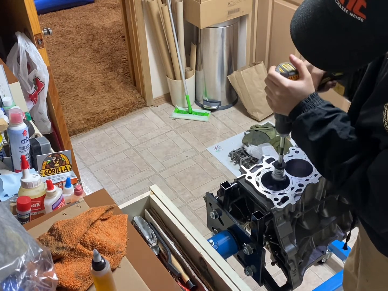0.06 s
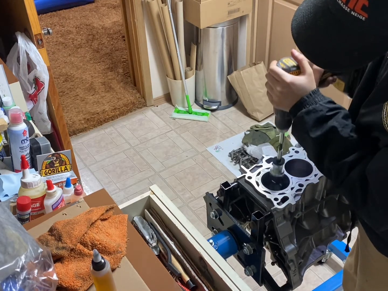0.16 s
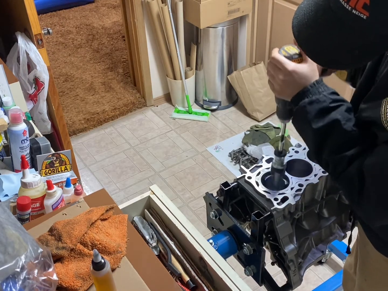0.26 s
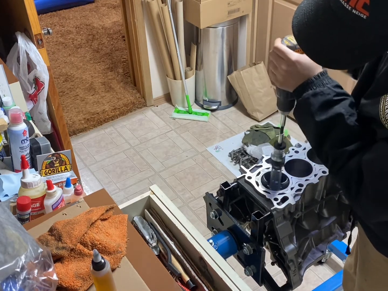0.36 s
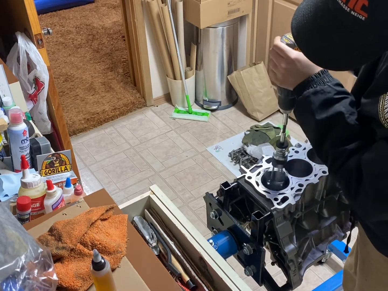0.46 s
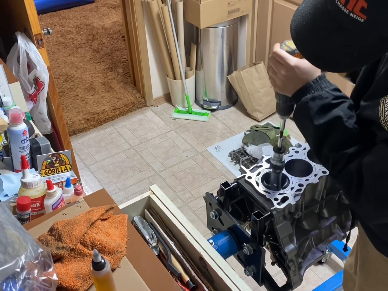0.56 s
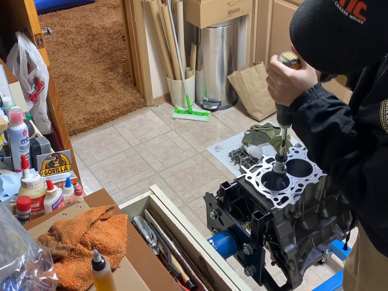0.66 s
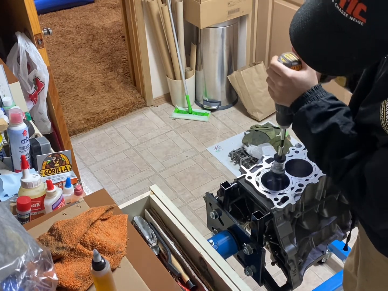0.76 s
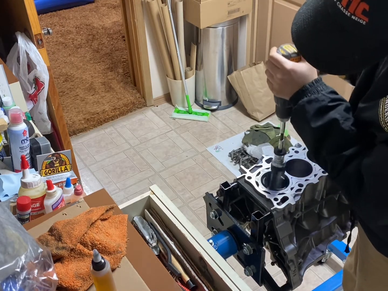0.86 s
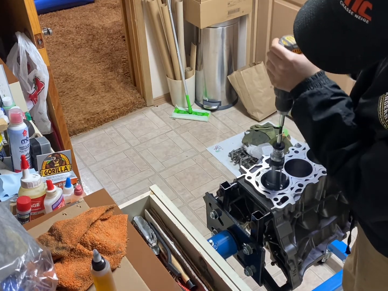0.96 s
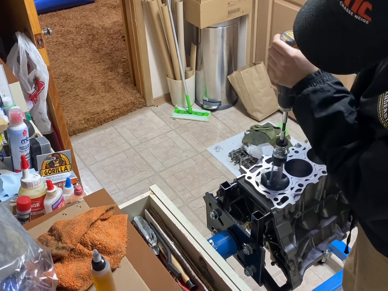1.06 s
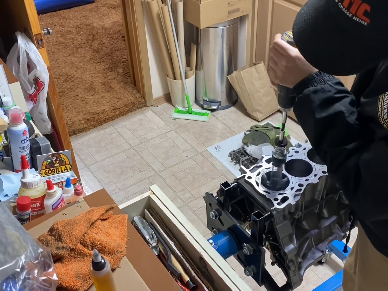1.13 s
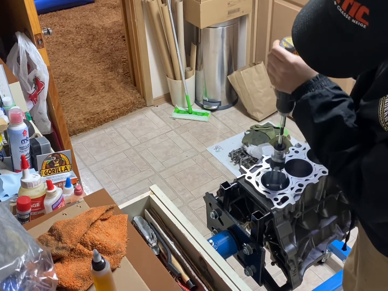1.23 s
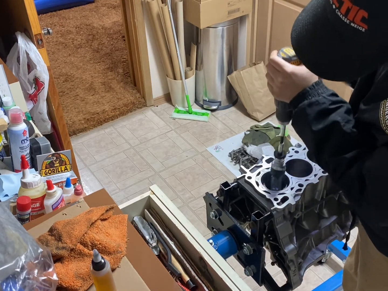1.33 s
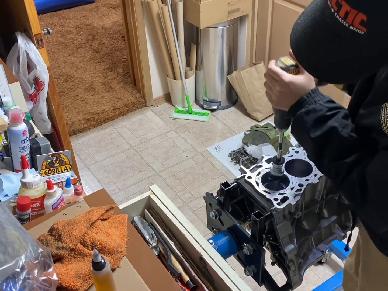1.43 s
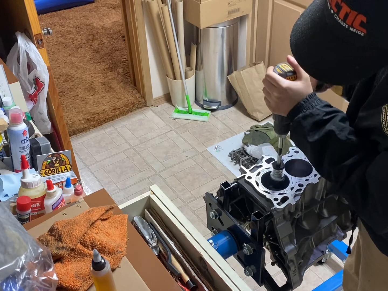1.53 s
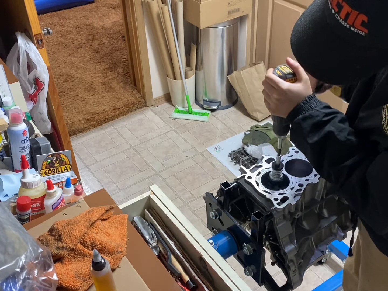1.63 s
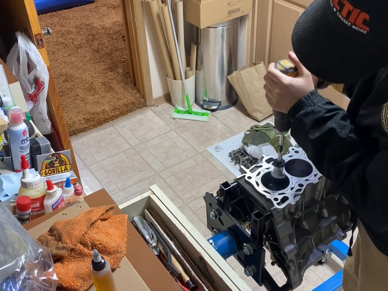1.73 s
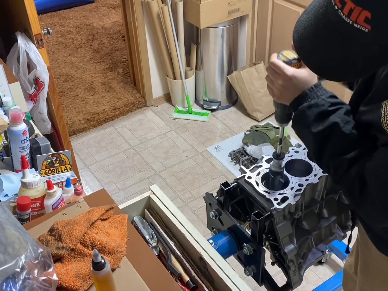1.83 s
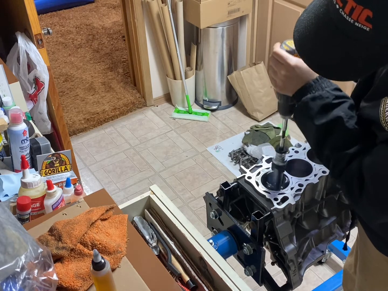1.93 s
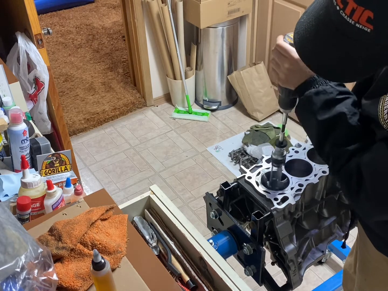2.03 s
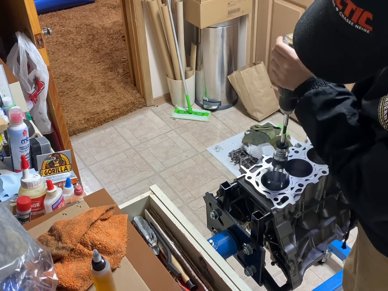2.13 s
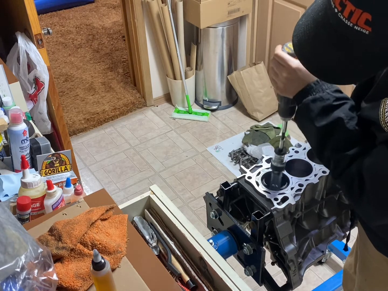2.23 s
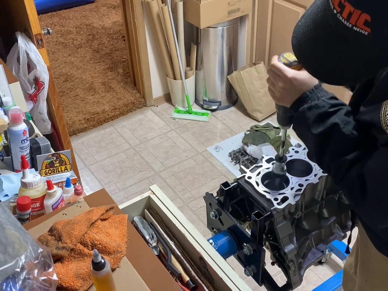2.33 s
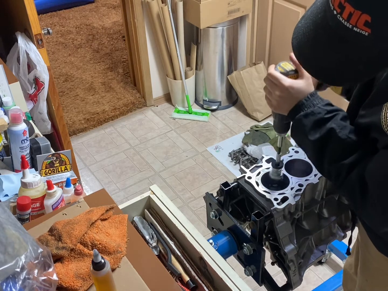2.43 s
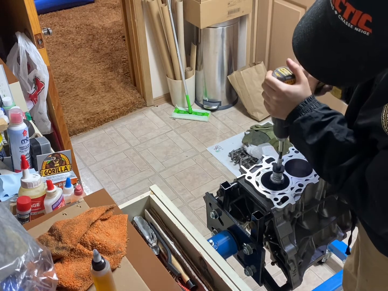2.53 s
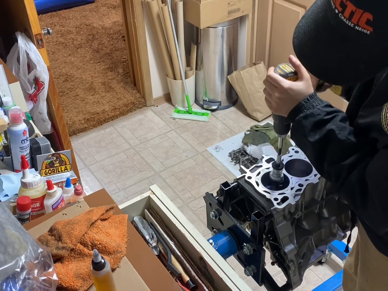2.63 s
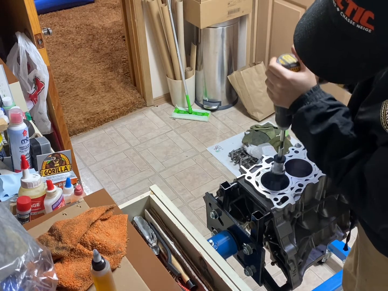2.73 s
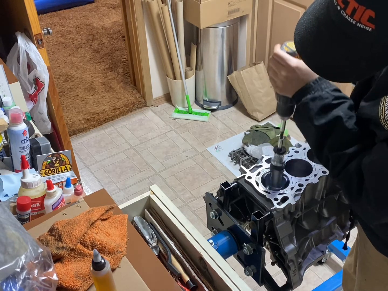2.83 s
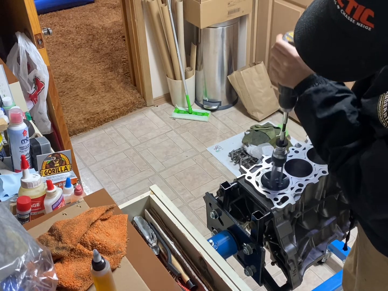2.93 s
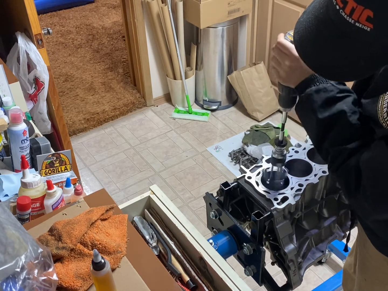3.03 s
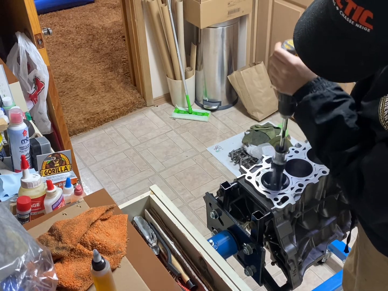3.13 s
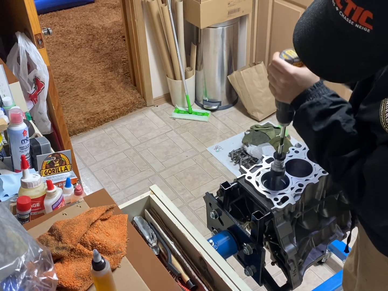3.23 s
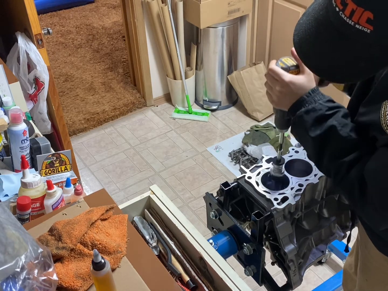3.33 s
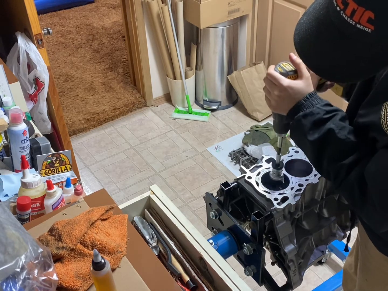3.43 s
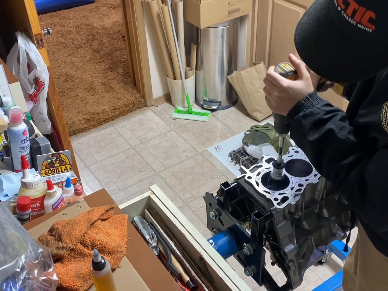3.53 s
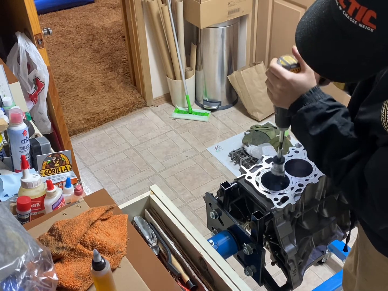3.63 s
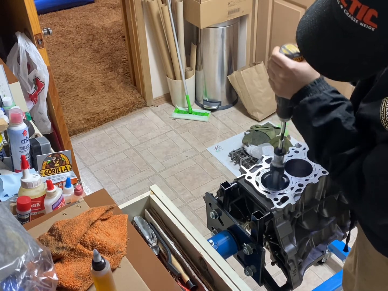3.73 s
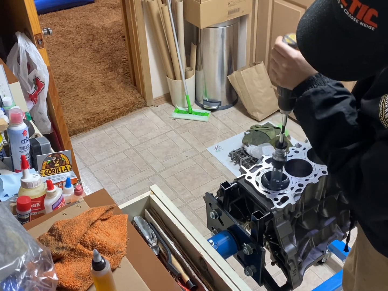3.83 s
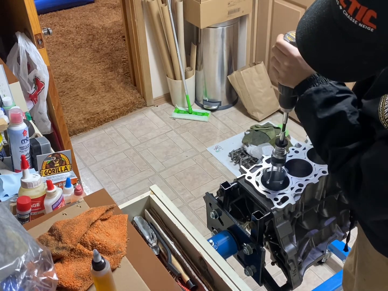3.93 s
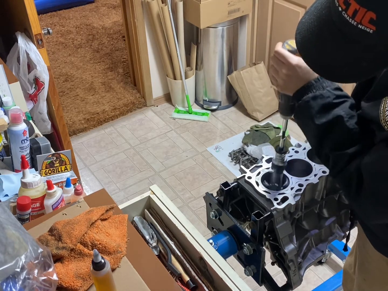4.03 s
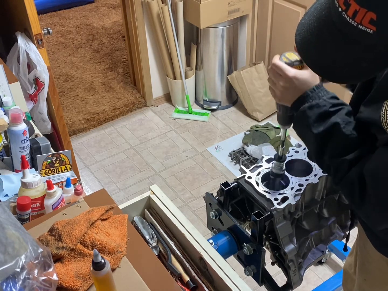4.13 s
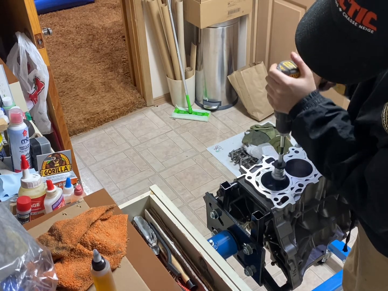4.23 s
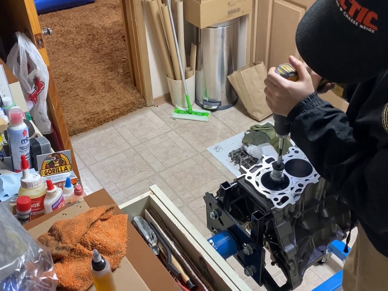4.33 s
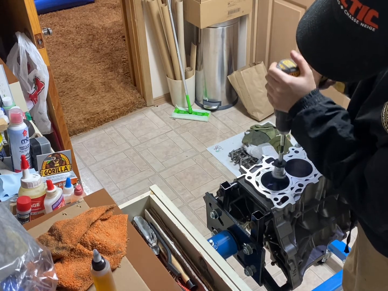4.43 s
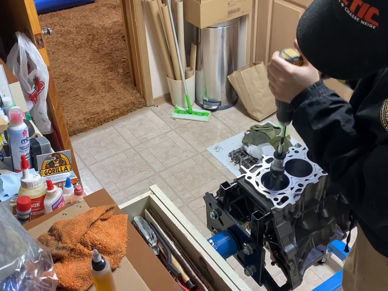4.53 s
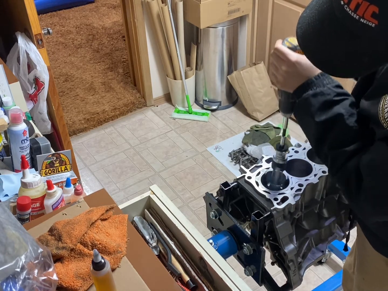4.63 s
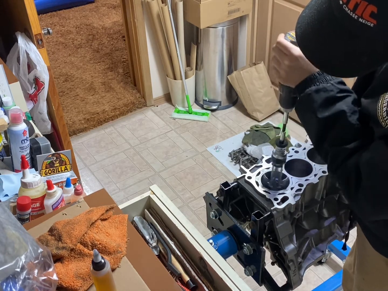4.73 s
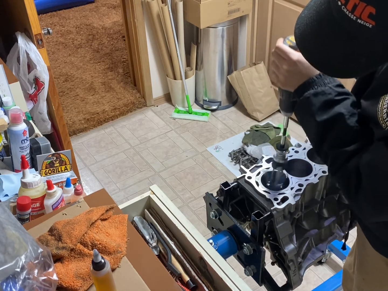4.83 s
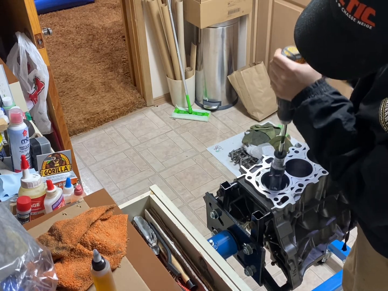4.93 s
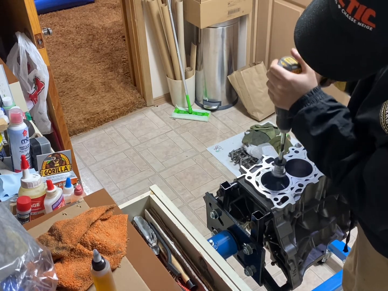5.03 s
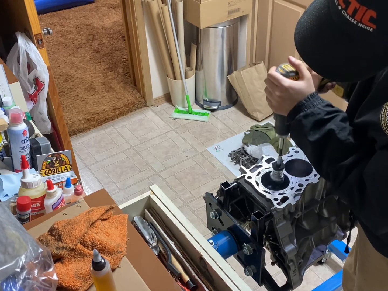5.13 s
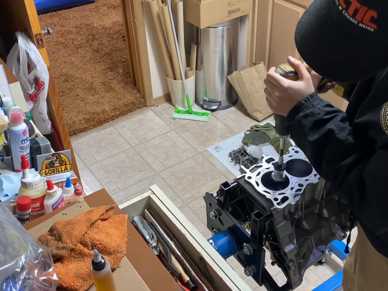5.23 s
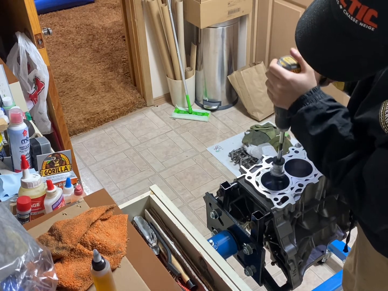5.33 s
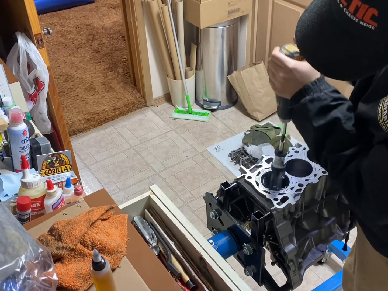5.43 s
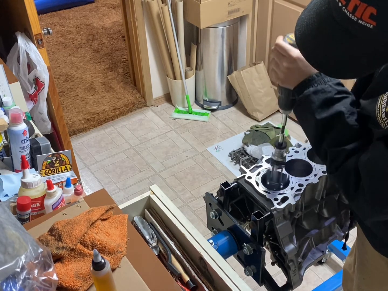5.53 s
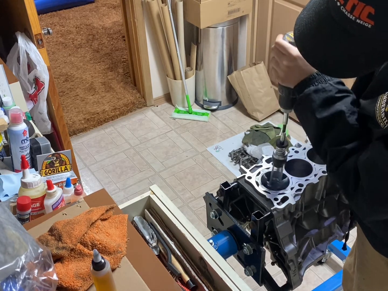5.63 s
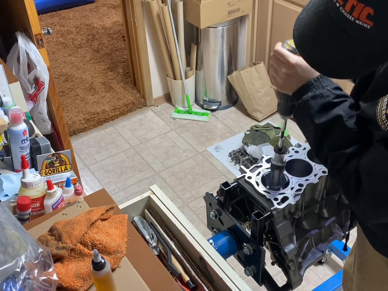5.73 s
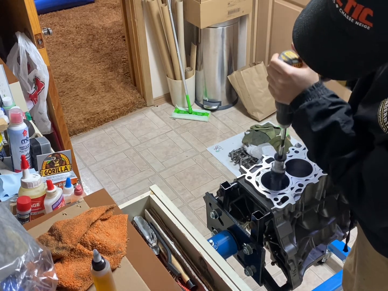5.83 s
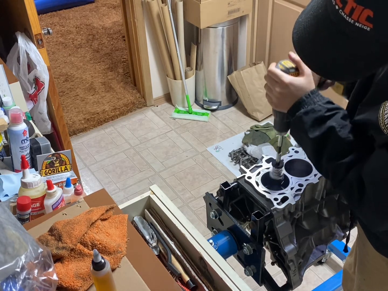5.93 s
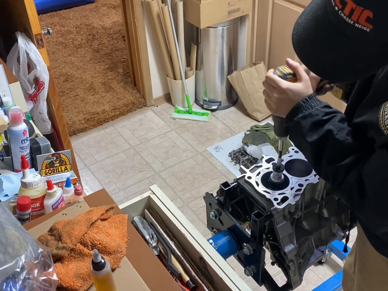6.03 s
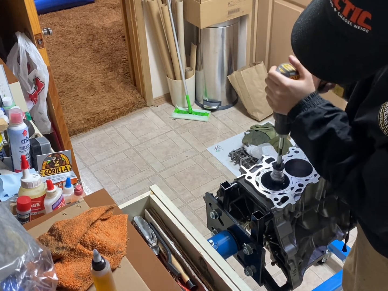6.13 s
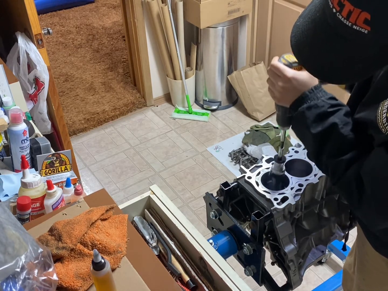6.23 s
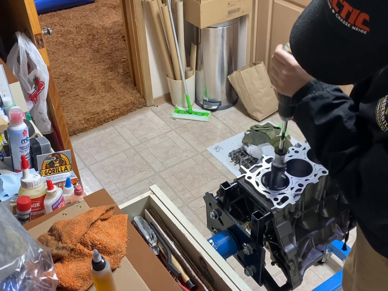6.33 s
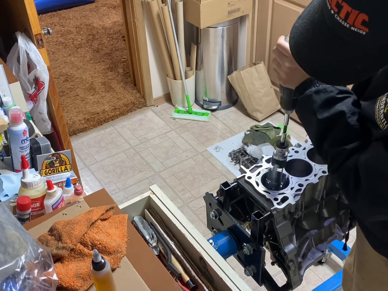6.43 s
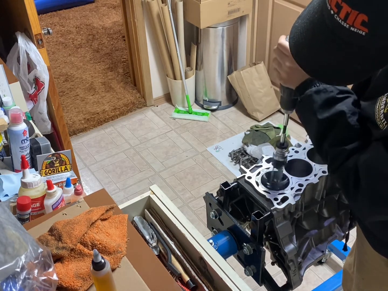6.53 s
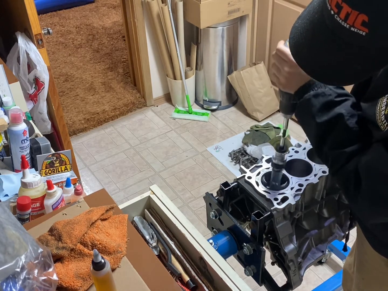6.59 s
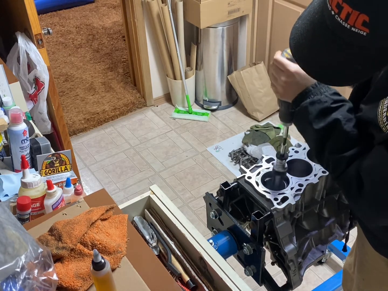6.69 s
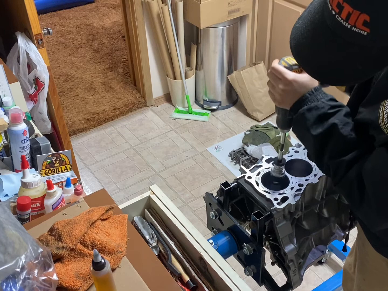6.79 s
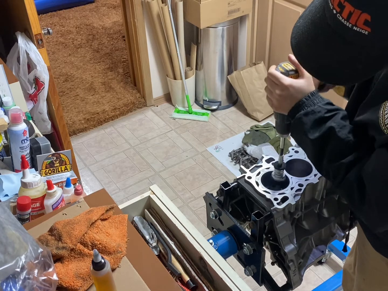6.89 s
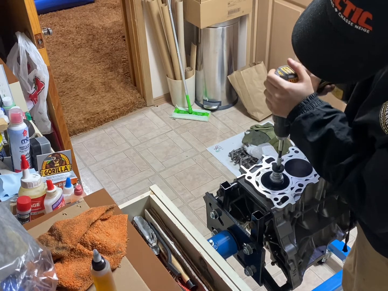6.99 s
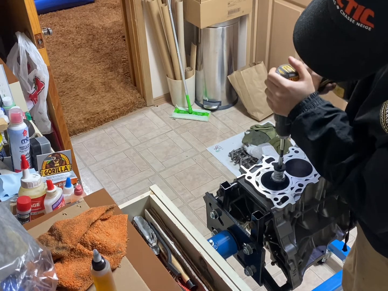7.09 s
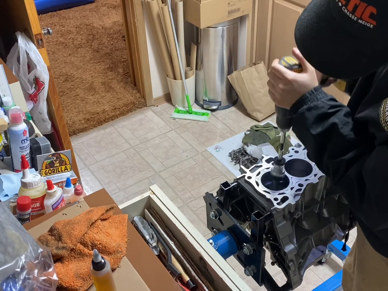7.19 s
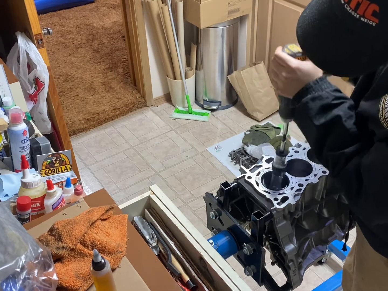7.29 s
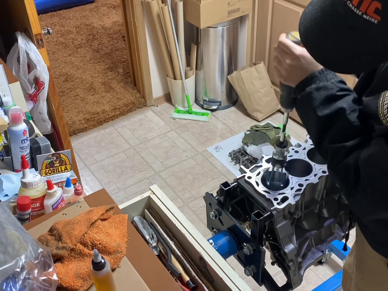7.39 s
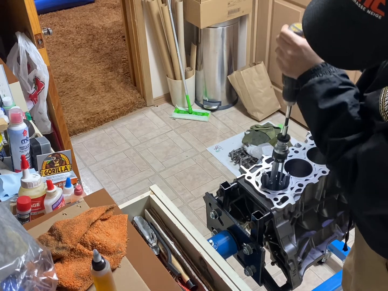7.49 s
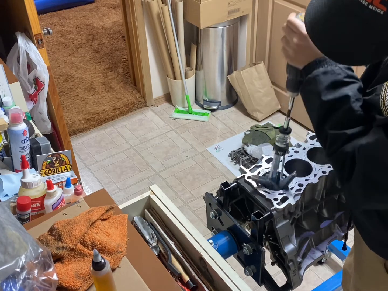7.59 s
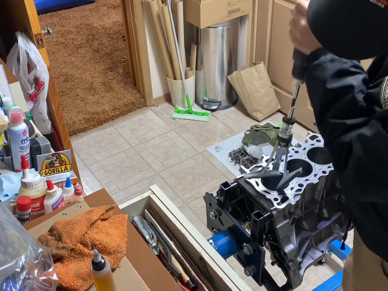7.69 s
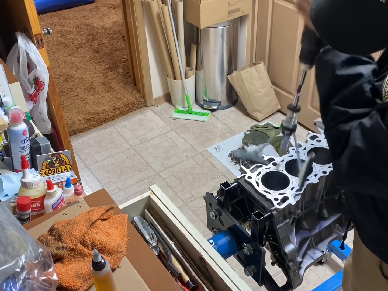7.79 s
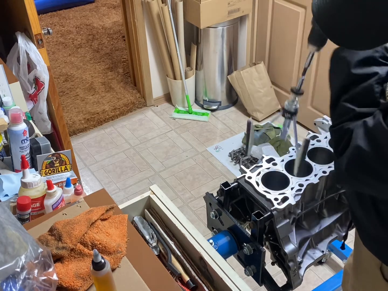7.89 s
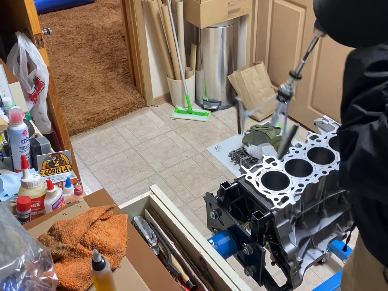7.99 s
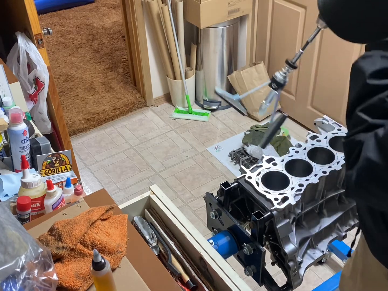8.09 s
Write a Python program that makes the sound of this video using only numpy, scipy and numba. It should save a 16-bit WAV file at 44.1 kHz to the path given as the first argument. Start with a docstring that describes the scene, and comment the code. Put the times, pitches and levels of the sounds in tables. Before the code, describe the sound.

Continuous dense scratching of stones on a metal bore, mixed with a constant-pitch electric whine whose overtones waver in loudness. Soft hollow swells follow the up and down strokes; tiny oily squeaks and occasional hard ticks ring the tool. After seven seconds the motor cuts out with a falling whine, a short scrape and small clacks follow, leaving faint low room rumble. Stereo, moderately close, short tiled reverberation.

```python
"""A cordless drill spins a three-stone hone up and down an oiled cylinder bore in a small tiled room.
The motor whines as sines on multiples of its shaft rate, over filtered noise for the stones' hiss and the bore's air;
the stones squeak on a slipping tone and snap against the wall as short noise bursts that ring the hone.
The drill brakes, the stones drag out of the bore and the sprung arms rattle in the air, over a low room rumble."""
import sys
import numpy as np
from scipy import signal
from scipy.fft import rfft, irfft, next_fast_len
from scipy.io import wavfile
from scipy.ndimage import uniform_filter1d
from numba import njit

SR = 44100
rng = np.random.default_rng(int(sys.argv[2]) if len(sys.argv) > 2 else 0)


def nominal_scale(level):
    """Amplitude ratio for a level in decibels (scalar or array-like)."""
    x = np.asarray(level, float) / 20
    return 10 ** x


def log_audio(samples):
    """Write samples as a 16-bit WAV file to the path given in sys.argv[1]."""
    # one column per channel
    frames = np.atleast_2d(samples).T
    # limit to full scale, then quantise
    limited = np.clip(frames, -1, 1)
    pcm = np.round(limited * 32767).astype(np.int16)
    wavfile.write(sys.argv[1], SR, pcm)


N = 359415
T = np.arange(N) / SR
PADDED = next_fast_len(N + 8192)
F = np.fft.rfftfreq(PADDED, 1 / SR)

BRAKE_S, BRAKE_LENGTH_S, STOP_S = 7.36, 0.1, 7.432
BORE_BOTTOM_DB = -58.5

# strokes of the hone: (bottom time [s], top time [s], level of the bore's air at the top [dB])
STROKES = [(0.12, 0.5, -64), (0.873, 1.265, -57.5), (1.717, 2.1, -62), (2.629, 3.0, -57.5),
           (3.496, 3.98, -64.5), (4.417, 4.773, -57.5), (5.274, 5.58, -57.5), (6.012, 6.404, -60),
           (6.948, 7.304, -59.5)]
# after the stop the stones drag out, snap free and swing: (start [s], hold [s], level [dB], fade [dB/s])
SCRAPES = [(7.438, 0.28, -44.5, 800), (7.774, 0.041, -39, 600), (7.842, 0.035, -64, 202),
           (8.073, .008, -60, 174)]
# modes of hone arms and stones: (frequency [Hz], width [Hz], rubbed level before tilt [dB], struck level [dB])
HONE = [(1000, 30, -10, -12), (1170, 40, -6, -8), (2530, 110, -6, 2), (2800, 50, 1, 4), (3660, 50, -13, -1),
        (4020, 60, -13, 0), (4330, 150, -15, 3), (5020, 45, -5, 2), (5470, 95, -3, -7), (6580, 60, -4, -1),
        (7150, 120, -5, -9)]


def unit(x):
    """Scale to rms 1."""
    return x / np.sqrt(np.mean(x ** 2))


def by_hz(table, column=1):
    """A column of (frequency [Hz], ..) rows, interpolated over all frequencies."""
    table = np.array(table)
    return np.interp(np.log(F + 1), np.log(table[:, 0]), table[:, column])


def shape(x, gain):
    """Filter by a gain over frequency."""
    return irfft(rfft(x, PADDED) * gain, PADDED)[:N]


def resonance(hz, width_hz):
    """Response of one damped mode, gain 1 at its centre."""
    return 1j * F * width_hz / (hz ** 2 - F ** 2 + 1j * F * width_hz)


def walk(rate):
    """Random levels held 1 / rate s and slewed twice, rms 1."""
    k = int(SR / rate)
    levels = np.repeat(rng.standard_normal(N // k + 1), k)
    slewed = uniform_filter1d(uniform_filter1d(levels, k), k)
    return unit(slewed[:N])


@njit
def sweep(x, hz, sharpness):
    """Band-pass whose centre moves every sample."""
    y, band, low = np.empty(len(x)), 0., 0.
    for i in range(len(x)):
        g = np.tan(np.pi * hz[i] / SR)
        v = (band + g * (x[i] - low)) / (1 + g * (g + 1 / sharpness))
        band, low, y[i] = 2 * v - band, low + 2 * g * v, v / sharpness
    return y


def by_stroke(bottom, top):
    """A value that swings smoothly between its bottom and top figure with every stroke."""
    times = np.array(STROKES)[:, :2].ravel()
    ends = np.ravel([np.broadcast_to(v, len(STROKES)) for v in (bottom, top)], order="F")
    turn = np.interp(T, times, np.arange(len(times)))
    last = np.minimum(turn.astype(int), len(times) - 2)
    return ends[last] + (ends[last + 1] - ends[last]) * np.sin(np.pi / 2 * (turn - last)) ** 2


def bore_level_db():
    """Level of the air in the bore, which rises and falls with the strokes."""
    return by_stroke(BORE_BOTTOM_DB, np.array(STROKES)[:, 2])


def swells(rows, between_db):
    """A quiet level with flat-topped rises."""
    floor = nominal_scale(between_db)
    gain = floor
    for middle_s, half_s, db in rows:
        gain = gain + (nominal_scale(db) - floor) * np.exp(-np.abs((T - middle_s) / half_s) ** 5)
    return gain


def motor():
    """Sines on the shaft angle, and the angle itself; the brake pulls the speed down and silences them."""
    # shaft speed under the changing load: (time [s], speed [Hz])
    shaft_speed = [(0, 269.4), (.55, 268.9), (1.1, 269.5), (2.05, 270.2), (3.1, 270), (4.1, 270.2),
                   (4.65, 269.4), (5.65, 270.5), (6.65, 269.7), (7.15, 270.1)]
    # multiples of the shaft rate, whole from the motor, broken from the gears: (multiple, level [dB])
    steady_lines = [(3, -61.5), (7, -63), (10.55, -60), (12, -52), (12.63, -54), (13.1, -58.5),
                    (13.65, -56), (15, -58)]
    # multiples that follow the strokes: (multiple, level at the bottom [dB], level at the top [dB])
    stroke_lines = [(5, -56.5, -49.5), (14, -48, -44.5)]
    # the 4th multiple swells as the moving drill passes loud spots of the room:
    # (middle [s], half length [s], level [dB])
    fourth_swells = [(0.08, 0.061, -42.5), (0.45, 0.35, -47), (1.35, 0.35, -41), (2.04, 0.2, -39),
                     (2.48, 0.16, -44.5), (3.0, 0.091, -40), (4.05, 0.19, -43), (4.78, 0.1, -39),
                     (5.12, 0.19, -46), (5.62, 0.24, -40), (6.06, 0.16, -42), (6.45, 0.21, -40),
                     (7.05, 0.35, -40)]
    # the 16th multiple swells likewise: (middle [s], half length [s], level [dB])
    sixteenth_swells = [(0.05, .1, -41.5), (0.29, 0.084, -36), (0.55, 0.1, -36.5), (0.87, 0.11, -37.5),
                        (1.3, 0.041, -38.5), (1.6, 0.14, -42.5), (1.87, 0.11, -36), (2.27, 0.077, -34.5),
                        (2.57, 0.13, -38.5), (2.81, 0.061, -35), (3.22, 0.096, -34.5), (3.42, 0.068, -42.5),
                        (3.71, 0.073, -33), (4.1, 0.11, -37), (4.32, 0.11, -39.5), (4.58, 0.079, -35.5),
                        (4.94, 0.12, -35), (5.2, 0.098, -35), (5.41, 0.068, -36), (5.85, 0.11, -38),
                        (6.07, 0.11, -36.5), (6.3, 0.054, -38.5), (6.64, 0.069, -36.5), (6.9, 0.11, -36.5),
                        (7.09, 0.096, -36.5), (7.35, 0.088, -37)]

    braking = np.clip((T - BRAKE_S) / BRAKE_LENGTH_S, 0, 1)
    hz = np.interp(T, *np.array(shaft_speed).T) * (1 - braking ** 2) * (1 + 0.00054 * walk(30.0))
    angle = 2 * np.pi * np.cumsum(hz) / SR

    lines = [(k, nominal_scale(db)) for k, db in steady_lines]
    lines += [(k, nominal_scale(by_stroke(low, high))) for k, low, high in stroke_lines]
    lines += [(4, swells(fourth_swells, -50)), (16, swells(sixteenth_swells, -51))]
    lines += [(1, nominal_scale(-10 + bore_level_db()))]  # the shaft tone rises and falls with the bore's air
    whine = np.zeros(N)
    for k, gain in lines:
        flicker = nominal_scale(1.3 * walk(22) + 12 * braking * walk(150))
        whine += gain * flicker * np.sin(k * angle + rng.uniform(0, 2 * np.pi))
    return np.sqrt(2) * whine * nominal_scale(-40 * braking ** 2) * (1 - braking), angle


def contact():
    """Strength of the scratching: steady, a surge under the brake, then single scrapes over a faint floor."""
    hiss_db, surge_db, stop_fade_db_s, floor_db, scrape_rise_s = -33.5, 3, 1000, -76, 0.0066
    surge = surge_db * np.clip((T - BRAKE_S) / (STOP_S - BRAKE_S), 0, 1)
    gain = nominal_scale(hiss_db + surge - stop_fade_db_s * np.maximum(T - STOP_S, 0)) + nominal_scale(floor_db)
    for start_s, hold_s, db, fade_db_s in SCRAPES:
        rise = np.clip((T - start_s) / scrape_rise_s, 0, 1)
        gain += rise * nominal_scale(db - fade_db_s * np.maximum(T - start_s - hold_s, 0))
    return gain


def bore_air(grit):
    """The scratching excites the air in the bore, which sounds lower when it is louder."""
    level_db = bore_level_db()
    hz = np.clip(391.0 + 28 * (-54.5 - level_db), 250, 900)
    air = grit
    for _ in range(3):
        air = sweep(air, hz, 1.1)
    return unit(air) * nominal_scale(level_db + np.minimum(0, -90 * (T - BRAKE_S)))


def stones(angle):
    """Grit of uneven size scratches the wall; pressure varies with the shaft; the arms and the bore's air ring."""
    # spectrum of the hiss of stones and brushes: (frequency [Hz], relative density [dB per Hz])
    hiss_spectrum = [(280, -74.5), (680, -15.5), (830, -5), (1650, -5), (2300, -6.5), (3800, 1.5),
                     (5000, -1), (7500, -1), (9000, 2.5), (9700, -2.5), (11000, -7.5), (12700, -22),
                     (15500, -19.5)]
    turn_db = (T < BRAKE_S) * 0.27 * np.sin(angle)
    pressure_db = 0.95 * walk(150) + 0.52 * walk(12) + turn_db
    grit = unit(rng.standard_normal(N) * nominal_scale(1.97 * rng.standard_normal(N) + pressure_db))
    scratch = unit(shape(grit, nominal_scale(by_hz(hiss_spectrum))))

    # inside the bore the low modes lead; once the arms snap free the high ones do
    tilt_db = np.where(T < SCRAPES[1][0], -1.5, 4)  # per octave
    ring = np.zeros(N)
    for hz, width_hz, rubbed_db, _ in HONE:
        # the contact wanders over the stones, so each mode comes and goes on its own
        gain = nominal_scale(rubbed_db + tilt_db * np.log2(hz / 3500) + 4.5 * walk(20))
        ring += gain * shape(scratch, resonance(hz, width_hz))
    ring = unit(ring)

    # a thin whistle flickers in the top
    whistle = nominal_scale(-20.0 + 4.8 * walk(28)) * unit(shape(grit, resonance(10260.0, 180.0)))
    # slow stones scratch fuller, and the free arms ring out more clearly
    body = unit(shape(grit, resonance(580.0, 460.0) ** 2))
    slow = nominal_scale(3.6 * walk(40)) * unit(scratch + nominal_scale(-21.5) * body)
    fast_hiss = scratch + whistle + 0.16 * ring
    slow_hiss = 0.8 * slow + np.where(T < STOP_S, 0.3, 0.7) * ring
    turning = T < BRAKE_S + BRAKE_LENGTH_S / 2
    return contact() * np.where(turning, fast_hiss, slow_hiss) + bore_air(grit)


def knocks():
    """Each knock is a sharp blow that rings the hone, then a short rattle of contacts round its own centre."""
    # stones and arms knocking: (time [s], peak before mixing [dB], centre [Hz], rise [ms])
    knock_rows = [(3.226, -22, 4300, 0.49), (2.182, -19, 4000, 3), (2.499, -20, 3100, 4.2),
                  (2.528, -18.5, 3600, 2), (2.542, -9.5, 3700, 0.2), (5.096, -19, 3930, 0.4),
                  (5.306, -19.5, 3960, 0.44), (6.071, -9.5, 3320, 0.36), (6.5516, -12, 5070, 0.22),
                  (6.757, -19.5, 3950, 0.4), (7.025, -19.5, 2990, 3), (7.396, -23, 4500, 1),
                  (7.424, -26, 3510, 2.2), (7.507, -30, 2700, 2), (7.57, -16, 5370, 0.1),
                  (7.711, -31, 5600, 4), (7.7655, -38, 3420, 0.23), (7.786, -28.5, 2390, 2),
                  (7.807, -28, 6500, 2), (7.821, -28, 5200, 1.1), (7.8808, -39, 6500, 3),
                  (7.948, -46, 5000, 1), (8.076, -32, 5000, 0.13)]
    rattle_s, free_rattle_s = 0.0065, 0.003  # decay times in the bore and in the air
    blows, taps = np.zeros(N), np.zeros(N)
    t = np.arange(int(.06 * SR)) / SR
    # the stone rebounds every 7.5 ms, weaker each time under the rattle's decay
    rebounds = 0.33 + np.exp(-(t % .0075) / 0.0018)
    thin = signal.butter(2, [1500, 9000], "band", fs=SR, output="sos")
    for s, peak_db, hz, rise_ms in knock_rows:
        own_band = signal.butter(1, [0.69 * hz, 1.67 * hz], "band", fs=SR, output="sos")
        band = np.vstack([own_band, thin])
        rattle = rebounds * np.exp(-t / (rattle_s if s < STOP_S else free_rattle_s))
        rise = 1 - np.exp(-1000 * t / rise_ms)
        crack = signal.sosfilt(band, rng.standard_normal(len(t)) * rattle * rise)
        tap = signal.sosfilt(band, 1. * (t == 0))
        i = int(s * SR)
        blows[i:i + len(t)] += (nominal_scale(peak_db) * crack / np.abs(crack).max())[:N - i]
        # slow rises tap more softly
        taps[i:i + len(t)] += (nominal_scale(peak_db - 15 * rise_ms) * tap / np.abs(tap).max())[:N - i]

    modes = sum(nominal_scale(struck_db) * resonance(hz, width_hz) for hz, width_hz, _, struck_db in HONE)
    struck = np.where(T < STOP_S, 1, 0.4) * (1.2 * blows + 4.5 * taps)
    # the block answers
    block = resonance(165.0, 61.0) ** 2 + 2.5 * resonance(700.0, 900.0) ** 2
    thud = nominal_scale(-27) * shape(np.abs(blows), block)
    return 0.7 * blows + shape(struck, modes) + thud


def squeaks():
    """Short bursts of stick-slip on one tone, over a faint flickering murmur of it."""
    # a stone squeaks on the oil film: (start [s], peak before flicker [dB])
    squeak_rows = [(0.3137, -33), (0.35, -35), (0.3905, -40), (0.43, -42), (1.1563, -41), (1.235, -40),
                   (2.9007, -40), (3.083, -41), (3.6436, -37.5), (4.6289, -39), (5.3105, -37),
                   (5.5234, -38), (5.6321, -42), (6.3596, -37), (6.4803, -36), (6.6094, -40), (6.6883, -35)]
    tone_hz, half_s, murmur_db = 2141, 0.015, -53
    swell = (T < BRAKE_S) * nominal_scale(murmur_db + 4.7 * walk(14))
    for s, peak_db in squeak_rows:
        swell += nominal_scale(peak_db) * np.exp(-((T - s - half_s) / half_s) ** 2)
    flicker = nominal_scale(4 * walk(350) - 2)
    hz = tone_hz * (1 + .009 * walk(220))
    return swell * flicker * np.sin(2 * np.pi * np.cumsum(hz) / SR)


def room(x, t60_s=0.2, wet_db=-3.5):
    """Dense echoes off tiles and cupboards, different at each microphone; their pattern shifts as the drill moves."""
    t = np.arange(int(.3 * SR)) / SR
    dull = shape(x, 1 / (1 + (F / 9000.0) ** 6))
    # wandering shares of five echo patterns, at constant total power
    places = np.array([walk(5) for _ in range(5)])
    shares = places / np.sqrt(np.sum(places ** 2, axis=0))
    wet = 0
    for share in shares:
        echoes = rng.standard_normal((2, len(t))) * nominal_scale(-60 * t / t60_s) * (t > .003)
        echoes /= np.sqrt(np.sum(echoes ** 2, axis=1, keepdims=True))
        wet = wet + signal.oaconvolve((share * dull)[None], echoes, axes=1)[:, :N]
    return nominal_scale(wet_db) * wet


def room_tone():
    """Low rumble of the house as shaped noise, nearly the same at both microphones."""
    # spectrum of the rumble: (frequency [Hz], relative density [dB per Hz])
    rumble_spectrum = [(30, -19), (70, -1.5), (120, -2), (170, -4.5), (550, -21), (9000, -23.5)]
    gain = nominal_scale(by_hz(rumble_spectrum))
    mid, side = (unit(shape(rng.standard_normal(N), gain)) for _ in range(2))
    return nominal_scale(-72) * (mid + 0.13 * side * np.array([[1], [-1]]))


def scene():
    """Drill and hone, with stones and knocks both direct and through the room."""
    whine, angle = motor()
    tool = stones(angle) + knocks()
    return whine + squeaks() + nominal_scale(0.5) * tool + room(tool) + room_tone()


def roll_off(x):
    """The treble ends steeply here."""
    return signal.sosfilt(signal.butter(12, 15750, fs=SR, output="sos"), x)


def record(dry):
    """The two ports hear each band at their own level and phase; the treble reaches the left one later."""
    # microphone pair: (frequency [Hz], left minus right [dB], left lead before the treble lag [rad])
    port_rows = [(121, 1, 0.15), (276, -5.5, 0.93), (790, 0, -1.16), (1125, -2, 1), (1490, -1.5, -1.37),
                 (2230, 1.5, 0.35), (3160, 2, 1), (4400, 0, 0.71), (5100, 4.5, -1.48), (7800, 0.5, -0.039)]
    lag_from_hz, lag_s = 6650, 12.3 / SR
    lead = by_hz(port_rows, column=2) - 2 * np.pi * lag_s * np.maximum(F - lag_from_hz, 0)
    # each port takes half of the difference
    half = nominal_scale(by_hz(port_rows) / 2) * np.exp(.5j * lead)
    heard = np.array([shape(dry[0], half), shape(dry[1], 1 / half)])
    return roll_off(heard)


dry = scene()
out = record(dry)
log_audio(out)
```